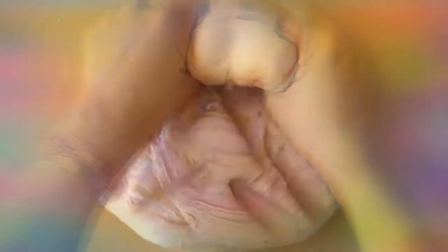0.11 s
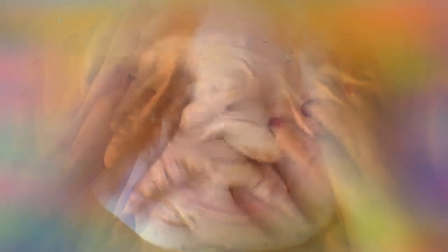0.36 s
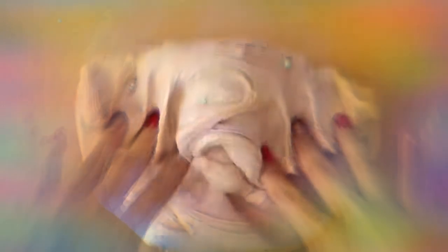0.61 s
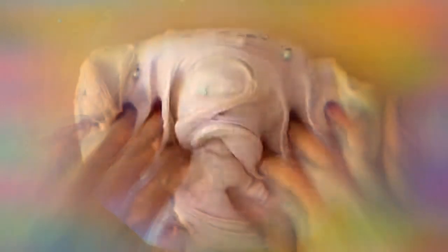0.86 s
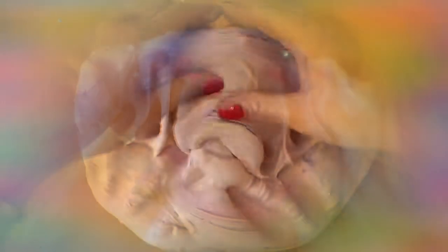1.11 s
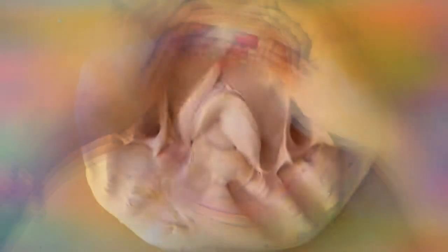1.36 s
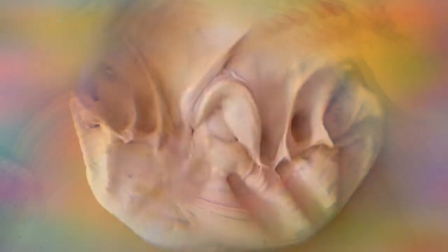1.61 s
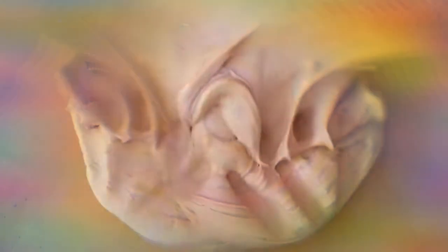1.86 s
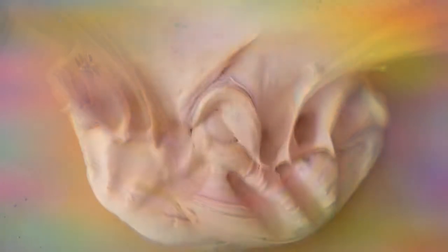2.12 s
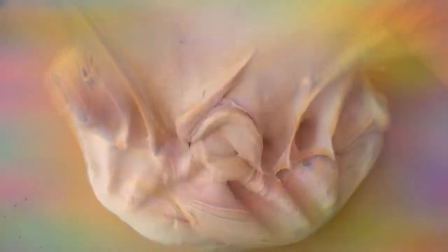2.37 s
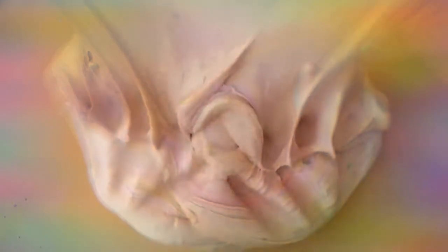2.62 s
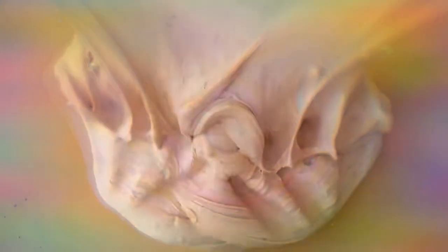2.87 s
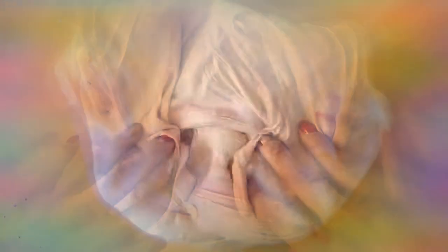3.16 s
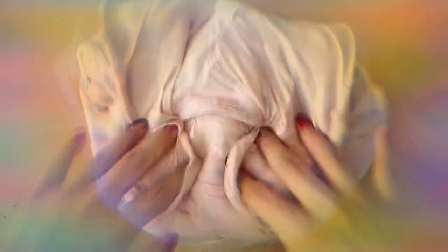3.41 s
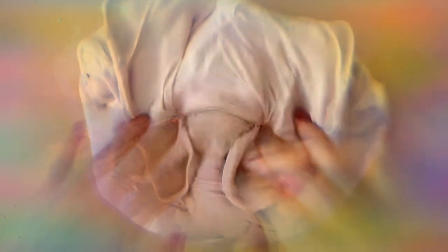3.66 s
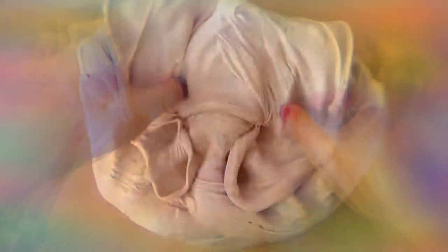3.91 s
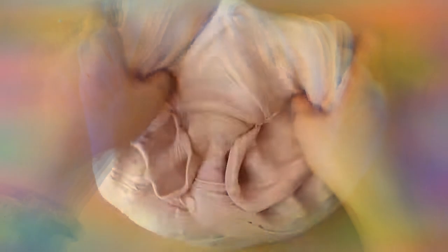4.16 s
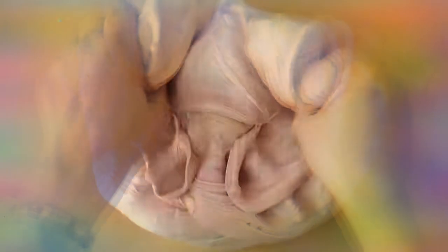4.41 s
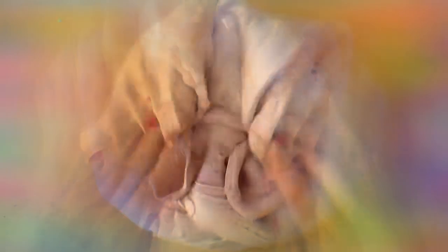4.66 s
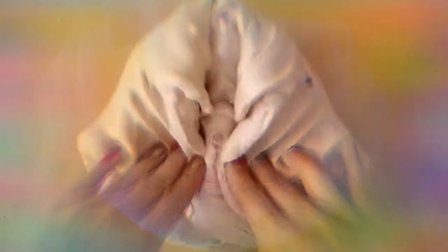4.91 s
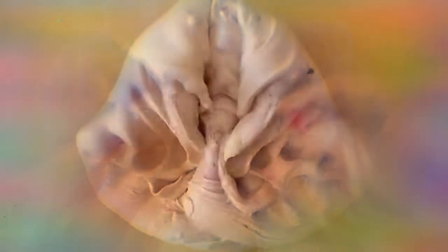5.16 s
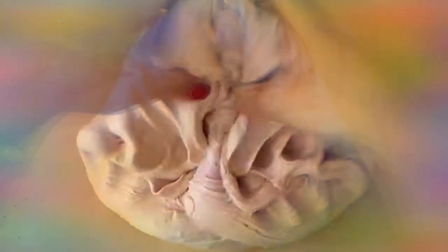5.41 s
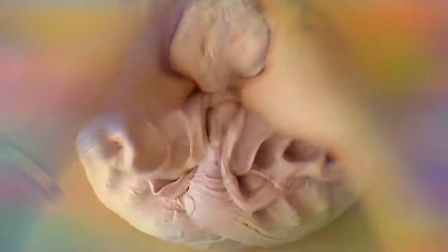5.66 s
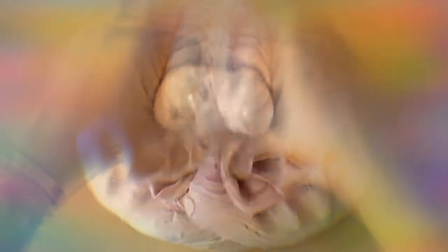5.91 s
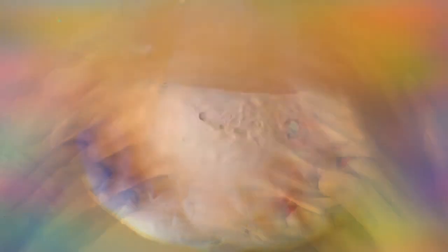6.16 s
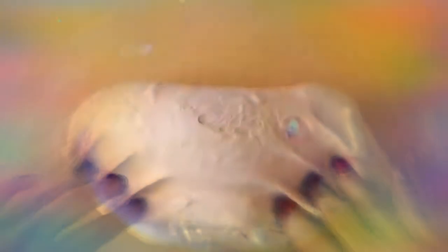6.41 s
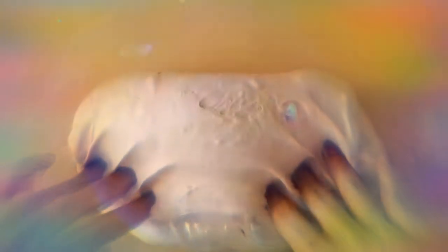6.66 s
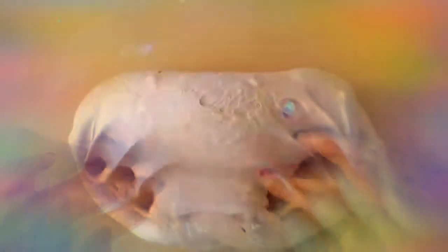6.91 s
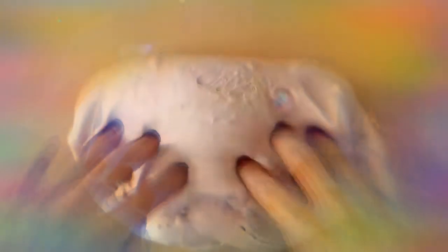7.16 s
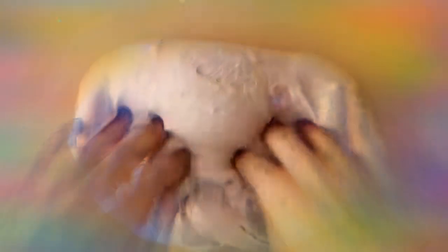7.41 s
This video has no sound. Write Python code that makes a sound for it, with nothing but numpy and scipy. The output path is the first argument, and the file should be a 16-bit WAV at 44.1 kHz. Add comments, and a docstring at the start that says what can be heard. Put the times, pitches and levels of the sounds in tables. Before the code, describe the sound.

Hands stretch, fold and press a big lump of wet slime on a wooden table, with fizzing crackles, squelches, sharp pops and soft thuds.

```python
"""Wet slime fizzes and squelches as it is stretched, and a first sharp pop comes almost at once, then a soft thud.
Hands knead, fold and press a big lump on a wooden table, close under a phone's two microphones.
Fizz and squelch are dense random clicks, coloured and made to swell; pops and blups are short fading swings.
Fingertips send short forces into ringing table modes; slow noise is the air pushed onto the microphone ports.
A quiet room adds a steady hush and a faint short answer."""
import sys
import numpy as np
from scipy import signal
from scipy.fft import rfft, irfft, next_fast_len
from scipy.io import wavfile
from scipy.ndimage import uniform_filter1d, map_coordinates

SR = 44100
rng = np.random.default_rng(int(sys.argv[2]) if len(sys.argv) > 2 else 0)


def linear_from_db(decibels):
    """Turn decibels (scalar or array-like) into linear amplitude factors; 0 gives 1."""
    return 10 ** (np.asarray(decibels, float) / 20)


def waveform_to_disk(signal):
    """Save audio, clipped to [-1, 1], as 16-bit WAV at the path in sys.argv[1]."""
    frames = np.transpose(np.atleast_2d(signal))
    scaled = np.clip(frames, -1, 1) * 32767
    samples = np.round(scaled).astype(np.int16)
    wavfile.write(sys.argv[1], SR, samples)


N = 332056

# Colour of the quiet room and microphone hiss: pitch_hz, relative level_db (per Hz)
ROOM_COLOUR = [(47, -22), (80, 11.5), (325, -11), (455, -19), (650, -18.5), (1240, -23.5), (2310, -23),
               (4410, -27.5), (15800, -31.5), (16100, -78)]
# How alike left and right are in the room hush: pitch_hz, likeness (0 to 1)
ROOM_ALIKE = [(60, 0.38), (500, 0.26), (3000, 0)]
# Hands sweeping past the microphones: start_s (strongest push), level_db (before flattening), fall_s
SWEEPS = [(0.261, -2, 0.15), (0.33, -12, 0.062), (0.577, -23, 0.15), (0.958, -23, 0.26), (1.151, -15, 0.31),
          (1.45, -24.5, 1), (1.78, -35, 0.32), (2.2, -9, 0.12), (2.324, -20.5, 0.48), (3.116, -14, 0.29),
          (3.299, -25, 0.081), (3.73, -17, 0.37), (4.05, -21.5, 0.59), (4.538, -15.5, 0.33),
          (5.21, -19, 0.55), (5.388, -9.5, 0.049), (5.599, -31.5, 1), (6.094, -13, 0.16), (6.5, -16, 0.035),
          (6.89, -21.5, 0.67)]
# Colour of the air pushes: pitch_hz, relative level_db (per Hz)
PUSH_COLOUR = [(8, 4.5), (22, 5.5), (50, -3.5), (62, -6.5), (82, -33), (140, -19), (300, -73.5)]
# Ringing modes of the table top: pitch_hz, relative level_db, ring_s (time to fade by 60 dB)
TABLE_MODES = [(107.4, 1, 0.25), (304, -8, 0.016), (391, -14, 0.057), (466, -8, 0.017), (745, -21, 0.013)]
# How alike left and right are in the table's murmur: pitch_hz, likeness (0 to 1)
TABLE_ALIKE = [(100, 0.099), (200, 0.8), (400, 0.55)]
# Fingertips and folds landing: start_s, relative knock_db, relative boom_db
THUDS = [(0.104, -24.5, -58), (0.243, -13, -49), (0.259, -16.5, -20.5), (0.345, -16.5, -62),
         (0.939, -16.5, -36), (0.95, -12.5, -28.5), (0.995, -16.5, -20.5), (1.151, -16, -25.5),
         (1.168, -14.5, -51), (1.363, -19, -40.5), (2.174, -17, -26), (2.284, -20.5, -60),
         (2.554, -29, -67), (2.696, -28, -64), (3.128, -17.5, -25), (3.715, -5.5, -17.5), (3.725, -17, -60),
         (4.58, -13.5, -28.5), (5.144, -15, -22), (5.16, -9, -46), (5.202, -15, -25), (5.253, -13.5, -56),
         (5.355, -19.5, -16), (5.396, -36, -23.5), (5.455, -22, -58), (5.496, -22, -67),
         (6.031, -19, -35.5), (6.4584, -17, -17.5), (6.527, -13.5, -61), (6.827, -17, -23),
         (6.841, -19, -19.5), (6.855, -33, -14), (6.863, -24, -25.5), (7.003, -23.5, -59),
         (7.149, -16, -64), (7.161, -20, -52)]
# Hollows closing or letting go: start_s, relative level_db, pitch_hz, fade_cycles (to about a third)
BLUPS = [(0.9535, -23, 402, 1.7), (1.167, -23.5, 553, 0.19), (2.2, -23, 37, 3.8),
         (2.2806, -17.5, 44.8, 2.5), (3.1294, -20.5, 304, 0.32), (3.7171, -11, 452, 2.5),
         (5.4985, -29, 546, 1.3), (6.4553, -14.5, 342, 0.76), (6.5291, -21.5, 600, 0.48),
         (6.8247, -16.5, 620, 0.53), (6.838, -20, 500, 2), (6.853, -17, 574, 1.5), (6.8607, -22, 1130, 2.2),
         (7.131, -25, 605, 1.2), (7.163, -22.5, 670, 2.6)]
# Bursting air pockets: start_s, relative level_db, pitch_hz
POPS = [(0.0768, -11.5, 8400), (0.2005, -13, 7300), (0.2445, -11.5, 1720), (0.259, -13, 1550),
        (0.3477, -18, 2930), (0.3653, -17, 6190), (0.367, -18.5, 770), (0.558, -36.5, 2900),
        (0.63, -37, 2500), (0.642, -38, 4500), (0.6596, -26.5, 3800), (0.7754, -32, 8310),
        (0.7877, -34.5, 4580), (0.826, -35.5, 2170), (0.872, -43, 2000), (0.8542, -31, 1280),
        (1.1453, -31, 2930), (1.1611, -41, 3250), (1.186, -25.5, 7060), (1.1674, -18.5, 2200),
        (1.2575, -22, 9300), (1.2705, -15, 6930), (1.289, -18, 3520), (1.2992, -11.5, 4450),
        (1.3207, -13.5, 1600), (1.3641, -14, 5100), (1.378, -15.5, 4000), (1.403, -16, 1950),
        (1.4118, -8.5, 9590), (1.45, -25, 6000), (1.4545, -14, 2900), (1.4875, -9, 2250),
        (1.4886, -13, 5700), (1.499, -15, 5400), (2.1599, -19, 6700), (2.1753, -17, 2030),
        (2.2813, -25.5, 1620), (2.523, -40, 2100), (2.599, -39.5, 2230), (2.6702, -27, 2290),
        (2.6948, -22, 2400), (2.6962, -18, 2200), (3.0405, -36, 12300), (3.0547, -31, 6900),
        (3.0684, -35, 6000), (3.181, -37, 2500), (3.2254, -33, 12500), (3.267, -37, 8000),
        (3.2854, -40, 3000), (3.3243, -38, 5500), (3.3484, -31, 3240), (3.3902, -38, 5000),
        (3.445, -37, 2880), (3.6005, -31, 5070), (3.6836, -5, 5800), (3.696, -17, 1300), (3.902, -9, 5900),
        (3.9144, -9.5, 4800), (3.9158, -10, 9200), (3.9302, -12.5, 4860), (4.022, -13.5, 9100),
        (4.0806, -25, 3960), (4.1777, -13.5, 10400), (4.2048, -17.5, 8360), (4.2254, -12.5, 11600),
        (4.2497, -15, 7200), (4.2757, -16.5, 5750), (4.467, -21, 1500), (4.573, -8, 7000),
        (4.578, -15, 2820), (4.601, -25, 900), (4.664, -21, 4400), (4.6899, -17.5, 4040), (4.722, -22, 950),
        (4.7934, -21.5, 2250), (4.9319, -16.5, 2300), (5.1126, -29, 8250), (5.159, -21.5, 2500),
        (5.2995, -49, 2600), (5.348, -28, 5070), (5.3565, -30, 2570), (5.3946, -26.5, 1150),
        (5.4165, -21, 2600), (5.4167, -15, 9500), (5.4215, -19, 8240), (5.429, -3.5, 11700),
        (5.4501, -20, 7900), (5.4745, -26, 10100), (5.456, -21.5, 3140), (5.4964, -20, 4360),
        (5.4987, -20, 1520), (5.602, -13, 1210), (5.6095, -24, 1010), (5.6257, -10, 4270),
        (5.6286, 0.5, 12000), (5.663, -12, 5340), (5.6767, -21, 7700), (5.732, -20, 6200),
        (5.744, -11.5, 8700), (5.8275, -11.5, 7400), (5.9108, -4, 9600), (5.9681, -12, 4370),
        (6.0006, -19, 11250), (6.048, -18.5, 1200), (6.072, -24, 1000), (6.179, -36, 1000),
        (6.2345, -21, 2870), (6.279, -18, 10900), (6.2895, -42, 980), (6.3244, -22, 8860),
        (6.36, -38, 1300), (6.3693, -38, 1780), (6.3939, -33, 10960), (6.437, -42, 1400),
        (6.4558, -29, 3100), (6.765, -39, 1690), (6.8865, -26.5, 1490), (7.1203, -24, 1240),
        (7.1306, -31, 2720), (7.1456, -12, 1100), (7.162, -16, 1430), (7.2517, -28.5, 4820),
        (7.42, -34.5, 1820), (7.367, -23, 1880)]
# Slime pulled or folded: start_s (most strain), fizz level_db, squelch level_db, rise_s, fall_s
PULLS = [(0.04, -38.5, -50, 0.12, 0.17), (0.264, -33, -30, 0.1, 0.074), (0.357, -31.5, -42, 0.061, 0.033),
         (0.431, -39, -47.5, 0.055, 0.06), (0.666, -64, -61.5, 0.17, 0.12),
         (0.784, -58, -61.5, 0.017, 0.098), (1.23, -56, -55.5, 0.072, 0.27),
         (1.373, -31.5, -39.5, 0.094, 0.16), (1.49, -32.5, -40.5, 0.12, 0.12),
         (1.57, -35, -42, 0.037, 0.17), (1.85, -46.5, -59.5, 1, .3), (2.041, -38, -49, 0.19, 0.13),
         (2.387, -35, -50.5, 0.097, 0.1), (2.715, -77, -57.5, 0.16, 0.063), (3.2, -65, -56.5, 0.22, 0.14),
         (4.026, -46, -44, 0.021, 0.056), (4.19, -43, -54.5, 0.2, 0.25), (4.572, -30, -36, 0.19, 0.11),
         (4.735, -33, -46, 0.087, 0.027), (4.85, -62.5, -60, 0.95, 0.59), (5.358, -44, -41, 0.0057, 0.012),
         (5.481, -47.5, -49.5, 0.079, 0.0043), (5.549, -42.5, -49, 0.062, 0.066),
         (5.615, -48, -45.5, 0.034, 0.15), (5.736, -44, -50, 0.04, 0.076), (5.903, -30, -47, 0.098, 0.19),
         (6.001, -24, -38, 0.12, 0.06), (6.063, -28.5, -50, 0.048, 0.011), (6.108, -42.5, -41, 0.06, 0.026),
         (6.195, -41.5, -50, 0.028, 0.036), (6.3, -60, -59, 0.88, 0.053), (6.384, -53, -58.5, 0.07, 0.045),
         (6.65, -68.5, -83, 0.61, 0.21), (7.3, -66.5, -64, 0.4, 1)]
# Fingers pressed in: start_s (contact), squelch level_db, relative table_db, fall_s
PRESSES = [(0.082, -74, -42.5, 0.13), (0.22, -59, -40, 0.19), (0.343, -34, -34, 0.047),
           (0.509, -61.5, -44.5, 0.11), (0.851, -62, -44.5, 0.32), (0.939, -39.5, -28.5, 0.11),
           (1.155, -41, -36, 0.024), (2.154, -35.5, -53.5, 0.071), (2.28, -47.5, -42, 0.073),
           (2.559, -68, -49, 0.14), (2.99, -60.5, -60, 0.12), (3.129, -50, -38, 0.066),
           (3.686, -40, -26.5, 0.11), (3.711, -41.5, -23.5, 0.07), (3.906, -49, -35, 0.085),
           (4.061, -65, -43.5, 0.12), (4.453, -54, -40, 0.12), (4.932, -44, -65, 0.046),
           (5.135, -43.5, -31, 0.14), (5.245, -75, -45, 0.14), (5.358, -57, -36.5, 0.14),
           (5.496, -36, -38, 0.021), (5.602, -38, -57, 0.027), (6.02, -35.5, -30, 0.12),
           (6.452, -63, -39.5, 0.19), (6.62, -83, -45.5, 0.19), (6.827, -41, -27.5, 0.12),
           (7.145, -41.5, -34, 0.13)]
# Colour of the fizz: pitch_hz, relative level_db (per Hz)
FIZZ_COLOUR = [(1500, -3.5), (3500, 3), (5500, 2.5), (8300, 8), (11600, 2.5), (14100, 6.5), (15700, 2),
               (16100, -63)]
# Colour of the squelch: pitch_hz, relative level_db (per Hz)
SQUELCH_COLOUR = [(300, 3), (700, 2), (1300, 0), (2500, 0), (4200, -4), (16000, -33)]
# How alike left and right are in the slime: pitch_hz, likeness (0 to 1)
SLIME_ALIKE = [(200, 0.85), (2000, 0.99), (6800, 0.56), (15000, 0.51)]

SPAN_DB = 20  # a swell changes by this much over its rise or fall time
# Slime settling and hands hovering; the table level is relative
REST_FIZZ_DB, REST_SQUELCH_DB, REST_TABLE_DB, REST_AIR_DB = -79, -80, -57, -43
PULL_ROUND, PRESS_ROUND, SWEEP_ROUND = 1.69, 1.84, 0.87  # roundness of the crests
SQUELCH_BRIEF = 0.91  # length of a pull's squelch over its fizz
PRESS_RISE_S, SWEEP_RISE_S = 0.006, 0.067
PRESS_FIZZ_DB = -6.5  # fizz of a press over its squelch
PORT_LIMIT = 0.4  # strong air pushes flatten towards this amplitude
BOOM_LAG_S = 0.0014  # the slow table mode reaches the right port late
BLUP_ATTACK_S = 0.00049
TOP_HZ = 16900  # band limit of the phone


def unit(x):
    """Scale to rms 1."""
    return x / np.sqrt(np.mean(x ** 2) + 1e-20)


def along(points, hz):
    """Read a curve of (Hz, value) points on a log pitch axis."""
    f, v = np.transpose(points)
    return np.interp(np.log(hz + 1), np.log(f + 1), v)


def wobble(rate):
    """A smooth random curve with rate knots a second."""
    knots = rng.standard_normal(int(N * rate / SR) + 4)
    return map_coordinates(knots, [np.arange(N) * rate / SR])


def filtered(x, response):
    """Shape x by a response that depends on frequency in Hz."""
    m = next_fast_len(N + SR // 2)
    return irfft(rfft(x, m) * response(np.fft.rfftfreq(m, 1 / SR)), m)[..., :N]


def sides(pan_db):
    """Left and right gains, pan_db apart."""
    return linear_from_db(np.array([pan_db, -pan_db]) / 2)


def stereo(pair, spectrum, alike):
    """Colour two unrelated signals and mix them into a left and right of given likeness, rms 1."""
    def shares(hz):
        angle = np.arccos(np.clip(along(alike, hz), -1, 1)) / 2
        return linear_from_db(along(spectrum, hz)) * [np.cos(angle), np.sin(angle)]

    mid, side = filtered(pair, shares)
    return unit(np.array([mid + side, mid - side]))


def swells(rows, rest_db, roundness):
    """Gain in time from (s, dB, rise s, fall s) swells, their powers added over a resting level."""
    step = 32  # samples between points of the curve
    t = np.arange(N // step + 2) * step / SR
    power = np.full(len(t), linear_from_db(2 * rest_db))
    for s, db, rise, fall in rows:
        away = np.where(t < s, (s - t) / max(rise, 0.002), (t - s) / max(fall, 0.005))
        power = power + linear_from_db(2 * (db - SPAN_DB * away ** roundness))
    return np.interp(np.arange(N) / SR, t, np.sqrt(power))


def bursts(rate, spread_db, clump_db):
    """Clumped random clicks, few large and many small; both ports share their timing."""
    chance = rng.random(N) < rate / SR
    click_db = spread_db * np.minimum(rng.exponential(size=N), 5)
    size = chance * linear_from_db(click_db + clump_db * wobble(60))
    return size * rng.standard_normal((2, N))


def room_tone():
    """The quiet room and the microphones' own hiss are steady coloured noise."""
    return linear_from_db(-54.0) * stereo(rng.standard_normal((2, N)), ROOM_COLOUR, ROOM_ALIKE)


def walls(x):
    """The room gives a short fading answer, different on each side."""
    t = np.arange(SR // 4) / SR
    tail = rng.standard_normal((2, len(t))) * linear_from_db(-60 * t / 0.29)
    return signal.fftconvolve(x, tail / np.linalg.norm(tail[0]), axes=1)[:, :N]


def hands():
    """Air pushes come in lumps, differ from port to port and flatten when strong."""
    rows = [(s, db, SWEEP_RISE_S, fall) for s, db, fall in SWEEPS]
    push = swells(rows, REST_AIR_DB, SWEEP_ROUND)
    lumps = linear_from_db(3.5 * np.array([wobble(14), wobble(14)]))
    flow = stereo(rng.standard_normal((2, N)), PUSH_COLOUR, [(30, 0.011)])
    air = push * unit(lumps * flow)
    return PORT_LIMIT * np.tanh(air / PORT_LIMIT)


def table(force, boom):
    """The table's lowest mode rings from slow pushes, the rest from sharper ones cushioned by slime."""
    def mode(f, hz, db, ring_s):
        turning = 2 * np.pi * hz
        return linear_from_db(db) * turning / ((np.log(1000) / ring_s + 2j * np.pi * f) ** 2 + turning ** 2)

    def upper_modes(f):
        cushion = 1j * f / 450 / (1 + 1j * f / 900)  # holds back the slow part of the force
        return SR * cushion * sum(mode(f, *row) for row in TABLE_MODES[1:])

    low = filtered(boom, lambda f: SR * mode(f, *TABLE_MODES[0]))
    return low + filtered(force, upper_modes)


def thuds():
    """Soft blows put a few milliseconds of uneven force into the table."""
    force, boom = np.zeros((2, N + SR)), np.zeros((2, N + SR))
    t = np.arange(SR // 50) / SR
    for s, db, boom_db in THUDS:
        uneven = 1 + 0.74 * rng.standard_normal(len(t))
        blow = linear_from_db(-60 * t / 0.018) * uneven * (1 - np.exp(-t / 0.00084))
        place = sides(3 * rng.standard_normal())
        start, late = round(s * SR), round((s + BOOM_LAG_S) * SR)
        force[:, start:][:, :len(t)] += linear_from_db(db - 22.0) * blow * place[:, None] * rng.choice([-1, 1])
        boom[[0, 1], [start, late]] += linear_from_db(boom_db) * place * [0.85, 1.1]
    return table(force[:, :N], boom[:, :N])


def murmur():
    """Pressing hands rub the table and keep it murmuring in its modes."""
    rows = [(s, db, PRESS_RISE_S, fall) for s, _, db, fall in PRESSES]
    work = swells(rows, REST_TABLE_DB, PRESS_ROUND)
    rub = work * unit(bursts(rate=3000.0, spread_db=1.5, clump_db=1.5))
    ringing = table(rub, 0.15 * rub)
    strength = np.sqrt(np.mean(ringing ** 2))
    return linear_from_db(-19.5) * strength * stereo(ringing, [(100, 0)], TABLE_ALIKE)


def blups():
    """A hollow gives a quick inward suck, then its air swings and fades."""
    out, t = np.zeros((2, N + SR)), np.arange(SR // 10) / SR
    for s, db, hz, cycles in BLUPS:
        swing = -np.cos(2 * np.pi * hz * t - 0.6) * np.exp(-t * hz / cycles)
        suck = swing * (1 - np.exp(-t / BLUP_ATTACK_S))
        place = sides(2 * rng.standard_normal())[:, None]
        out[:, round(s * SR):][:, :len(t)] += linear_from_db(db) * place * suck
    return out[:, :N]


def squelching():
    """Pulls and presses both work the wet folds; this is the squelch gain in time."""
    pulled = [(s, db, SQUELCH_BRIEF * rise, SQUELCH_BRIEF * fall) for s, _, db, rise, fall in PULLS]
    pressed = [(s, db, PRESS_RISE_S, fall) for s, db, _, fall in PRESSES]
    from_pulls = swells(pulled, REST_SQUELCH_DB, PULL_ROUND)
    return np.hypot(from_pulls, swells(pressed, -120, PRESS_ROUND))


def sticky_pops():
    """Extra pockets burst at random times, louder when the squelch is louder."""
    when, size, pitch = rng.random((650, 3)).T
    start = when * (N - 1)
    effort_db = 20 * np.log10(squelching()[start.astype(int)])
    return np.c_[start / SR, 0.75 * effort_db - 9 + 11 * size, 1000 * 12 ** pitch]


def pops():
    """A bursting pocket gives one quick breath, then weaker copies scattered off folds and fingers."""
    out, t = np.zeros((2, N + SR)), np.arange(SR // 200) / SR
    later = np.arange(SR // 60) / SR
    for s, db, hz in [*POPS, *sticky_pops()]:
        cycles = 0.75 * (5000 / hz) ** 0.3  # large pockets ring a little longer
        soft = min(1, 0.55 * np.sqrt(5000 / hz))  # and open with a rounder edge
        swing = np.cos(2 * np.pi * hz * t - 0.4 + 0.24 * rng.standard_normal())
        burst = swing * np.exp(-t * hz / cycles) * (1 - soft * np.exp(-t * hz * 5.4))
        # a slow return leaves almost no net air
        burst = burst - burst.sum() * np.exp(-t * hz * 0.5) / np.exp(-t * hz * 0.53).sum()
        noise = rng.standard_normal((3, len(later)))
        scatter = noise[0] + 0.5 * noise[1:]  # shared part plus one part for each side
        echoes = 0.11 * linear_from_db(-60 * later / 0.0065) * scatter * np.sqrt(hz / 5000)
        echoes[:, 0] = 1  # the direct sound
        sound = signal.fftconvolve(echoes, burst[None], axes=1)
        place = sides(2.5 * rng.standard_normal())[:, None]
        out[:, round(s * SR):][:, :sound.shape[1]] += linear_from_db(db) * place * sound
    return out[:, :N]


def patchy(x, depth_db):
    """Folds opening and closing shift the colour: random gain patches over frequency and time, rms 1."""
    z = signal.stft(x, nperseg=512)[2]
    field = uniform_filter1d(rng.standard_normal(z.shape[1:]), size=7, axis=0)
    field = uniform_filter1d(field, size=14, axis=1)
    return unit(signal.istft(z * linear_from_db(depth_db * unit(field)), nperseg=512)[1][:, :N])


def slime():
    """Tiny pockets burst in a dense fizz, bigger wet ones in a sparser squelch."""
    pulls = [(s, db, rise, fall) for s, db, _, rise, fall in PULLS]
    presses = [(s, db + PRESS_FIZZ_DB, PRESS_RISE_S, fall) for s, db, _, fall in PRESSES]
    stretched = swells(pulls, REST_FIZZ_DB, PULL_ROUND)
    squeezed = swells(presses, -120, PRESS_ROUND)
    tiny = stereo(bursts(rate=6000.0, spread_db=0.5, clump_db=1.5), FIZZ_COLOUR, SLIME_ALIKE)
    fizz = np.hypot(stretched, squeezed) * patchy(tiny, depth_db=3.0)
    wet = stereo(bursts(rate=2500.0, spread_db=1.6, clump_db=2.5), SQUELCH_COLOUR, SLIME_ALIKE)
    squelch = squelching() * patchy(wet, depth_db=1.8)
    return (fizz + squelch) * sides(1.8 * wobble(34))  # wanders between left and right


def scene():
    """Add slime, table and air, with the room answering the pops, blups and thuds."""
    near = pops() + blups() + thuds()
    far = linear_from_db(-21) * walls(near)
    return near + far + slime() + murmur() + hands() + room_tone()


def top_cut(x):
    """Nothing passes above the cut-off."""
    return signal.sosfilt(signal.butter(12, 17040, fs=SR, output="sos"), x)


def record(dry):
    """The phone keeps nothing above its band limit."""
    mix = filtered(dry, lambda hz: hz < TOP_HZ)
    return top_cut(mix)


dry = scene()
out = record(dry)
waveform_to_disk(out)
```